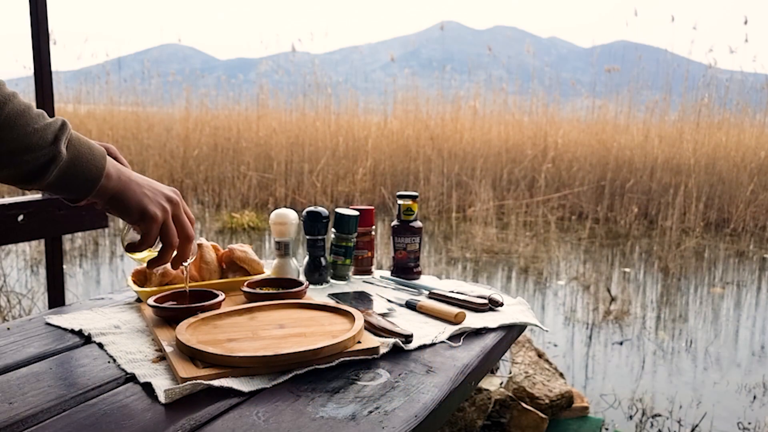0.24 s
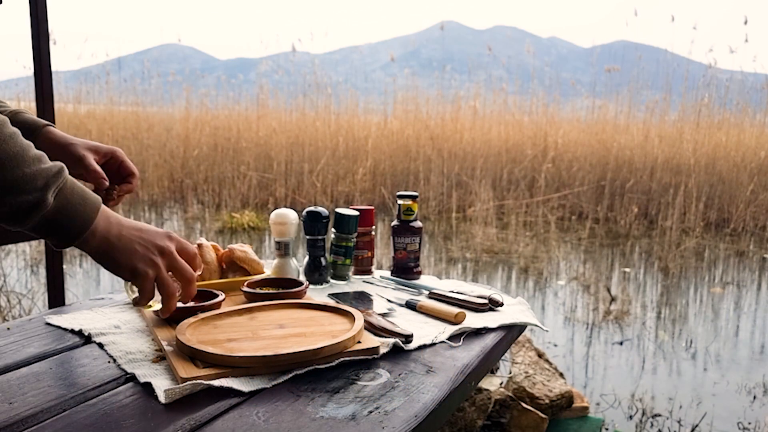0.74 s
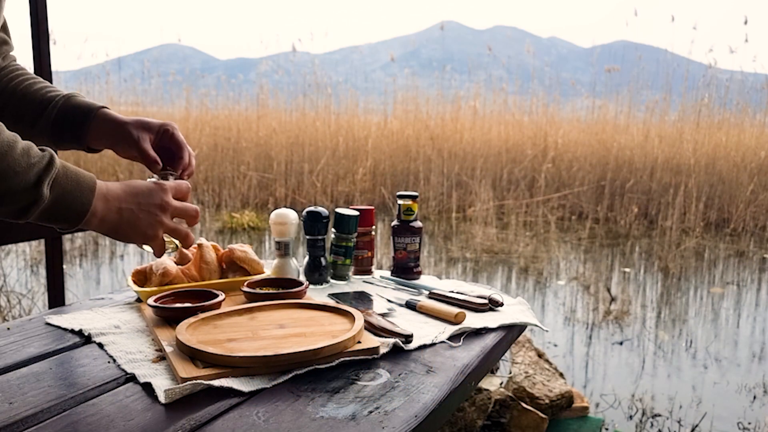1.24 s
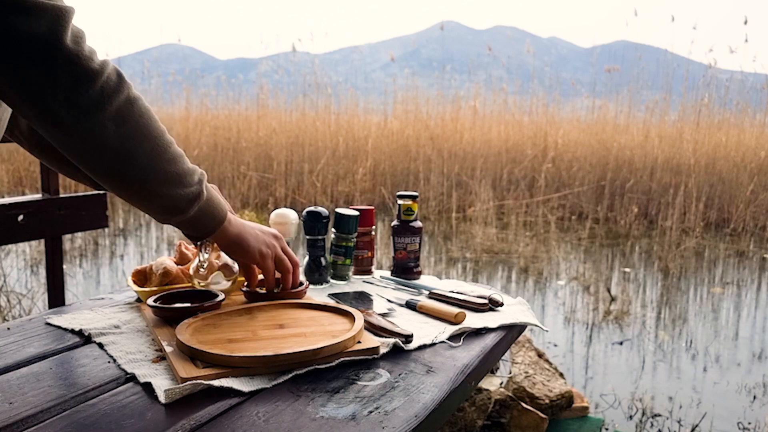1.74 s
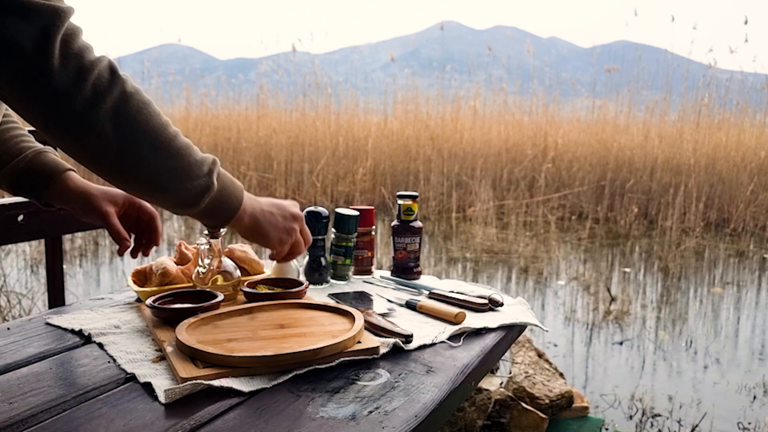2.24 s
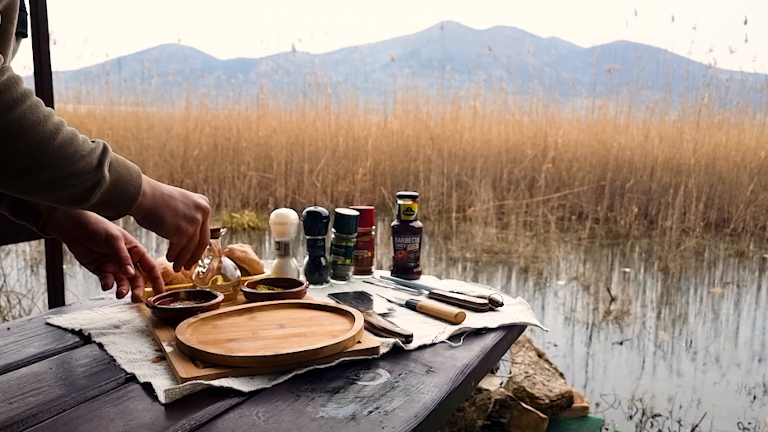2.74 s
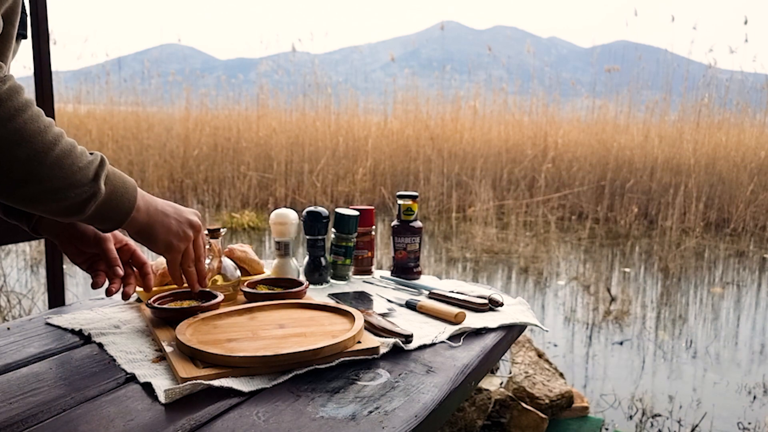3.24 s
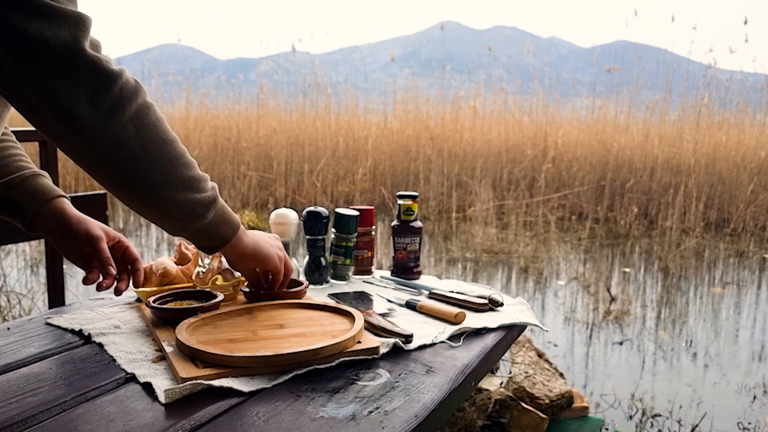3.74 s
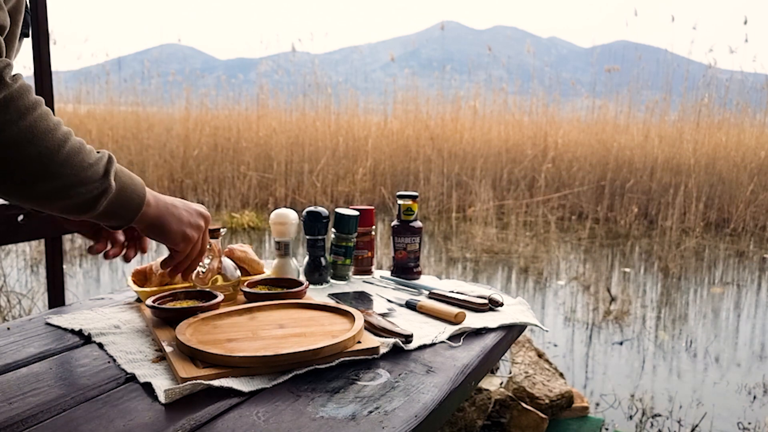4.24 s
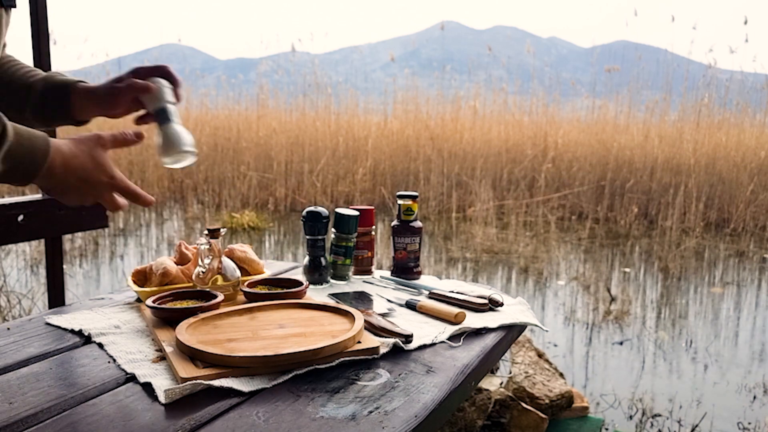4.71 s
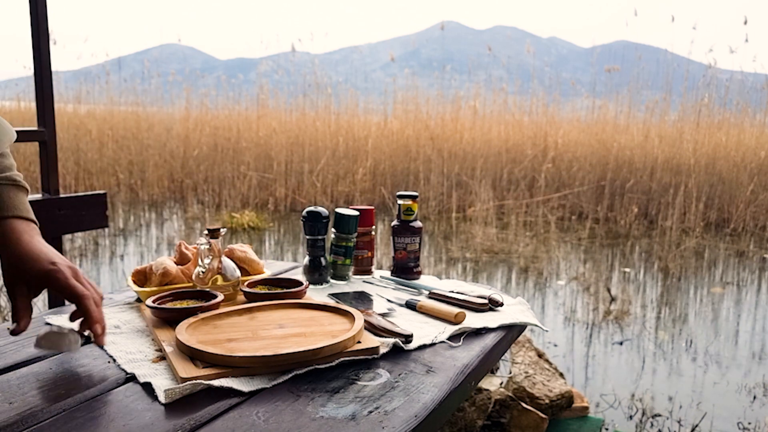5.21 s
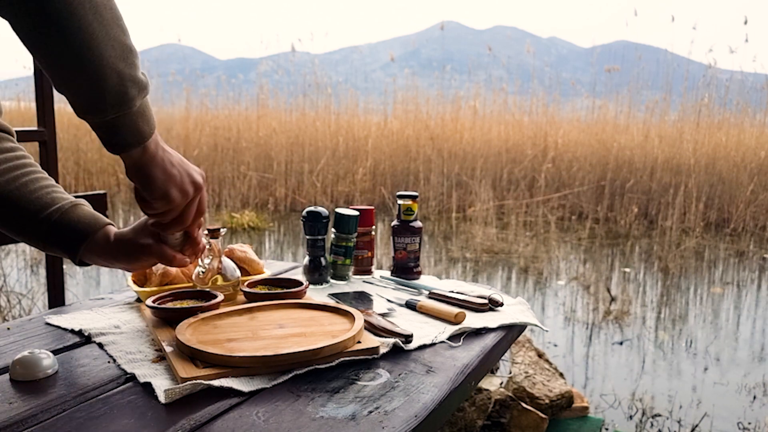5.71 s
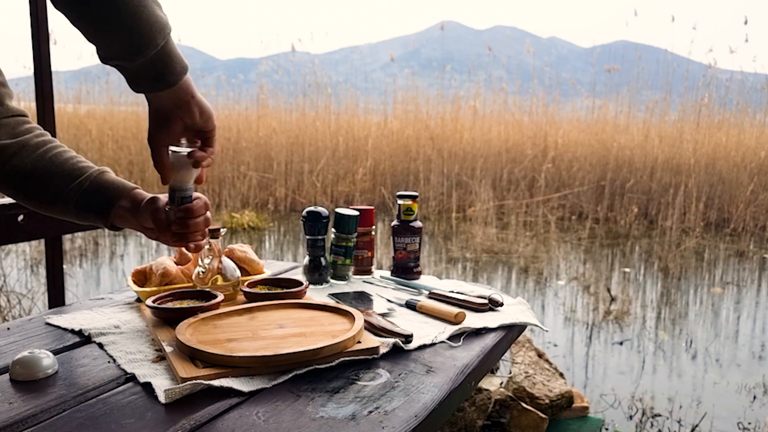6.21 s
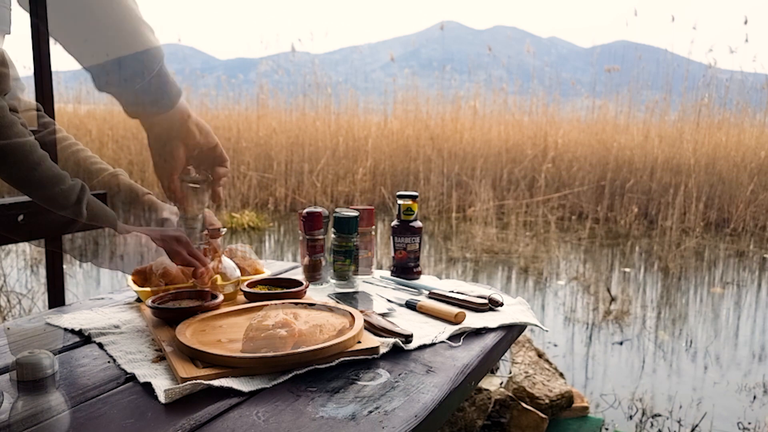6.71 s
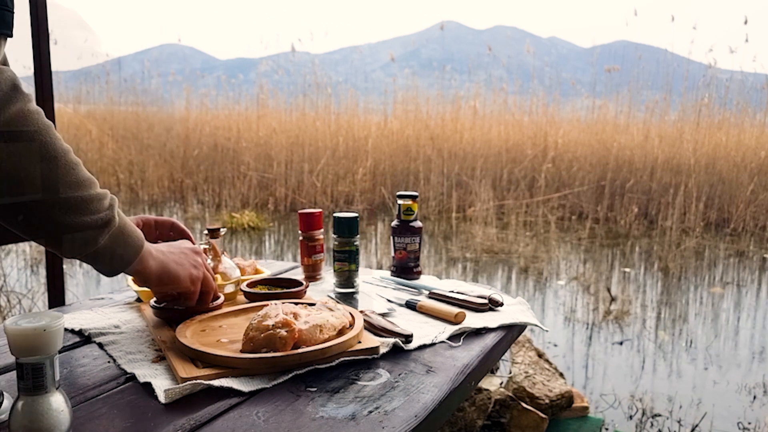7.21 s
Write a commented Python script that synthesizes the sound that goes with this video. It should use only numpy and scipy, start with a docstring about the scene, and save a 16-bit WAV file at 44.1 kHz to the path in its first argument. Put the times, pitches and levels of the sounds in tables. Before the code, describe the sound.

A quiet lakeside, heard in close stereo with the hands to the left. Low wind rumble, soft reed hiss, faint crackle and scattered water plips continue throughout; two brief gusts brush the microphones in the first 0.3 seconds. Thin ticks of fingers on jars and food come sparsely, with very faint bird-like whistles. At 1.8 a glass bottle clinks brightly on a clay bowl, chattering quickly over dull plank thuds until 1.95. At 4.6 salt slides with a short swish as the mill is lifted. At 5.0 its plastic cap clicks loose, then at 5.26 lands with a loud double crack and rattles to rest by 5.45. Dry, crisp salt crunches follow in short twists at 5.55, 5.75, 5.85, 6.15 and 6.6. From 6.7 the wind and lapping water grow fuller, with more ticks and a clearer plip near 7.4.

```python
"""Reeds hiss, water plips and a light wind rumbles by a lake while hands season food on a wooden table:
a glass bottle clinks on a bowl, a salt mill is lifted, its plastic cap pops off and bounces, the mill crunches.
Wind and water are shaped noise, glass, clay and planks damped modes, small contacts noise bursts in resonances,
salt random cracks. Two spaced microphones to the right of the hands give the left-right delay."""
import sys
import numpy as np
from scipy import signal
from scipy.fft import rfft, irfft, next_fast_len
from scipy.io import wavfile
from scipy.ndimage import uniform_filter1d, map_coordinates

SR = 44100
rng = np.random.default_rng(int(sys.argv[2]) if len(sys.argv) > 2 else 0)


def store_wav(level_fs):
    """Save 16-bit WAV to argv[1]."""
    pcm = np.round(np.clip(np.atleast_2d(level_fs), -1, 1) * 32767)
    wavfile.write(sys.argv[1], SR, pcm.T.astype(np.int16))


N = 328986


def amp(db):
    """dB to gain."""
    return 10 ** (np.asarray(db) / 20)


def unit(x):
    """Scaled to rms 1."""
    return x / np.sqrt(np.mean(x ** 2) + 1e-20)


def along(points, hz):
    """(Hz, value) points interpolated on a log frequency axis."""
    f, v = np.transpose(points)
    return np.interp(np.log(hz + 1), np.log(f + 1), v)


def shaped(spectrum):
    """Gain as a function of frequency, from (Hz, dB) points."""
    return lambda hz: amp(along(spectrum, hz))


def wobble(rate_hz):
    """A smooth random curve, rate_hz knots a second."""
    knots = rng.standard_normal(int(N * rate_hz / SR) + 4)
    return map_coordinates(knots, [np.arange(N) * rate_hz / SR])


def filtered(x, response):
    """x times a complex response of frequency."""
    m = next_fast_len(N + SR // 2)
    return irfft(rfft(x, m) * response(np.fft.rfftfreq(m, 1 / SR)), m)[..., :N]


def coloured(x, spectrum):
    """x through a spectrum, rms 1."""
    return unit(filtered(x, shaped(spectrum)))


def rush(spectrum, patchy_db):
    """Stereo noise of rms 1 with time-frequency patches of random gain; the sides differ more in the treble."""
    # left-right likeness: (frequency [Hz], correlation [0-1])
    likeness = [(25, .4), (60, .85), (300, .65), (700, .6), (1400, .35), (5000, .25), (7500, .05)]
    z = signal.stft(rng.standard_normal((2, N + 512)), nperseg=512)[2]
    field = rng.standard_normal(z.shape[1:])
    field = uniform_filter1d(field, size=6, axis=0)
    field = uniform_filter1d(field, size=8, axis=1)
    pair = signal.istft(z * amp(patchy_db * unit(field)), nperseg=512)[1][:, :N]

    def mid_side_gains(hz):
        turn = np.arccos(np.clip(along(likeness, hz), -1, 1)) / 2
        return shaped(spectrum)(hz) * [np.cos(turn), np.sin(turn)]

    mid, side = filtered(pair, mid_side_gains)
    return unit(np.array([mid + side, mid - side]))


def grit(rate_hz, spread_db):
    """Random single-sample cracks, a few much larger than the rest."""
    hits = rng.random(N) < rate_hz / SR
    sizes = np.minimum(rng.exponential(size=N), np.e)
    return hits * rng.choice([-1, 1], N) * amp(spread_db * sizes)


def ring(modes, rise_s, spread_db=2):
    """One blow: damped modes of jittered level, neighbours opposite in sign so close pairs swell; peak 1."""
    t = np.arange(SR // 5) / SR
    tone = np.zeros(len(t))
    for k, (hz, db, t60) in enumerate(modes):
        decay = amp(db + spread_db * rng.normal() - 60 * t / t60)
        tone += (-1) ** k * decay * np.sin(2 * np.pi * hz * t)
    x = tone * (1 - np.exp(-t / rise_s)) ** 2
    return x / np.abs(x).max()


def rattle(t60_s, response, blow=1.77):
    """A sharp blow and dying noise behind it, through a response of frequency; peak 1."""
    t = np.arange(4096) / SR
    x = amp(-60 * t / t60_s) * rng.standard_normal(len(t))
    x[0] = blow
    x = np.roll(x, 64)  # about 1.5 ms of lead-in
    x = irfft(rfft(x) * response(np.fft.rfftfreq(len(t), 1 / SR)))[:3500]
    return x / np.abs(x).max()


def resonance(f, modes, pitch_hz):
    """Causal sum of resonances given as (multiple of the pitch, relative width, dB)."""
    total = 0
    for k, (multiple, width, db) in enumerate(modes):
        centre = multiple * pitch_hz
        damping = 1j * f * width * centre
        total = total + (-1) ** k * amp(db) * damping / (centre ** 2 - f * f + damping)
    return total


def stroke(s, length_s, rise_s, fall_s):
    """Gain that swells up to time s, holds for length_s, then dies 60 dB in fall_s."""
    t = np.arange(N) / SR - s
    return np.clip(1 + t / rise_s, 0, 1) ** 2 * amp(-60 * np.clip(t - length_s, 0, 1) / fall_s)


def add(track, s, x):
    """Mixes a sound into a track at time s."""
    part = track[..., round(s * SR):][..., :x.shape[-1]]
    part += x[..., :part.shape[-1]]


def left_leads(pair, lead_samples):
    """The left microphone hears the source lead_samples before the right."""
    sides = np.array([[1], [-1]])  # each side shifted by half the lead
    return filtered(pair, lambda hz: np.exp(1j * np.pi * hz * lead_samples / SR * sides))


def placed(x, lead_samples, wet_db):
    """Source to the left; each side adds its own scattered answer, decaying noise."""
    # table, posts and roof: (frequency [Hz], decay t60 [s])
    shelter = [(300, 0.057), (2000, 0.088), (6000, 0.063), (14000, 0.055)]
    hz, t, z = signal.stft(rng.standard_normal((2, SR // 5)), SR, nperseg=128)
    decay = amp(-60 * t / along(shelter, hz)[:, None])
    tail = signal.istft(z * decay, SR, nperseg=128)[1]
    tail = tail / np.linalg.norm(tail[0])
    wet = signal.fftconvolve(np.pad(x, (8, 0))[None], tail, axes=1)[:, :N]
    return left_leads(x + amp(wet_db) * wet, lead_samples)


def air():
    """Wind rumble, lake murmur and reed hiss, noises drifting on their own; faint crackle rides on them."""
    # spectra: (frequency [Hz], relative level [dB per Hz])
    rumble_spectrum = [(12, -20), (20, 1.5), (48, -7.5), (97, -2), (166, 0.5), (216, -7), (271, -23),
                       (300, -29.5), (390, -46.5), (660, -120)]
    murmur_spectrum = [(150, -38.5), (250, -14), (710, -14), (802, -12.5), (1280, -14), (3340, -13.5),
                       (4820, -7.5), (6700, -23), (14400, -29), (16000, -39)]
    # reed hiss before and after the wind freshens: (frequency [Hz], relative level [dB per Hz])
    calm_reeds = [(3000, -41.5), (3900, -8.5), (4600, 5), (5200, 6), (6000, -18), (7500, -31.5)]
    fresh_reeds = [(3000, -30), (4400, -9), (5200, -1.5), (6100, -1.5), (7200, -12), (11000, -26)]
    # water stirred by the fresher wind: (frequency [Hz], relative level [dB per Hz])
    lapping = [(150, -13), (220, -4.5), (450, -0.5), (700, -13.5), (1500, -11), (3000, -27)]
    # the wind freshens: (start [s], end [s])
    freshen_s = (6.7, 6.8)
    crackle_spectrum = [(2000, -17.5), (6000, -6), (12000, -21.5), (16000, -18.5)]  # (Hz, dB)

    fresh = np.interp(np.arange(N) / SR, freshen_s, (0, 1))
    rumble_db = -77 + 6 * fresh + 1.23 * wobble(2.44) + 0.68 * wobble(5.7)
    murmur_db = -70 + 5 * fresh + 1.5 * wobble(6)
    reed_db = -69 + 5 * fresh + 0.54 * wobble(37)
    turn = fresh * np.pi / 2  # equal-power crossfade
    reeds = np.cos(turn) * rush(calm_reeds, patchy_db=1.6)
    reeds += np.sin(turn) * rush(fresh_reeds, patchy_db=1.6)
    out = amp(rumble_db) * rush(rumble_spectrum, patchy_db=2.0)
    out += amp(murmur_db) * rush(murmur_spectrum, patchy_db=2.84)
    out += amp(-68) * np.sin(turn) * rush(lapping, patchy_db=5.0)
    out += amp(reed_db) * reeds
    crackle = coloured(grit(33, spread_db=8.5), crackle_spectrum)
    return left_leads(out, 6.4) + amp(-86.0) * placed(crackle, lead_samples=7.7, wet_db=2.0)


def gusts():
    """Gusts brush the microphones: swells of low rumble and broad rustle noise."""
    # gusts: (time [s], length [s], fall t60 [s], rumble [dB], rustle [dB])
    gust_rows = [(0, .1, 0.047, -59, -57), (0.223, 0.02, 0.065, -59, -59.5),
                 (0.26, 0.022, .5, -58.5, -72.5)]
    # gust rumble and windscreen rustle: (frequency [Hz], relative level [dB per Hz])
    low_spectrum = [(30, -10), (90, 0), (170, -6), (300, -20), (600, -50)]
    rustle_spectrum = [(120, -36), (200, -5), (635, -3), (821, -10.5), (1840, -3), (7410, -18.5),
                       (9930, -35), (16000, -15)]
    low = rush(low_spectrum, patchy_db=1)
    rustle = rush(rustle_spectrum, patchy_db=4.5)
    out = np.zeros((2, N))
    for s, length, fall, low_db, rustle_db in gust_rows:
        swell = stroke(s, length, rise_s=0.013, fall_s=fall)
        out += swell * (amp(low_db) * low + amp(rustle_db) * rustle)
    return out


def small_contacts(rows, rise_s, t60_s, body, lead_samples, wet_db):
    """Rattles that swell briefly in a small resonant body tuned to the pitch of each."""
    out = np.zeros(N)
    for s, db, pitch_hz in rows:
        x = rattle(t60_s, lambda f: resonance(f, body, pitch_hz))
        x = x * (1 - np.exp(-np.arange(len(x)) / SR / rise_s)) ** 2
        add(out, max(s - .0015, 0), amp(db) * x / np.abs(x).max())
    return placed(out, lead_samples, wet_db)


def plips():
    """Short water plips as damped resonances, with fainter ones at random."""
    # plips: (time [s], level [dB], pitch [Hz])
    plip_rows = [(0.209, -46.5, 1850), (0.572, -55, 1580), (1.268, -52.5, 2030), (1.324, -56, 1940),
                 (2.065, -56, 780), (2.315, -50.5, 2210), (2.768, -57.5, 2030), (3.658, -53, 1970),
                 (3.739, -52, 1550), (3.848, -56.5, 790), (4.143, -56.5, 2150), (4.198, -51, 1970),
                 (4.543, -50.5, 1820), (5.047, -50.5, 1836), (6.274, -64, 900), (5.226, -55, 1980),
                 (5.478, -50, 2030), (6.276, -51.5, 1750), (6.432, -54.5, 2100), (6.832, -47.5, 1220),
                 (6.954, -50, 2500), (7.375, -38.5, 1657), (7.376, -51, 860)]
    body = [(1, 0.092, 4.5), (1.5, 0.12, -6.5), (2.4, 0.53, -18.5)]  # (multiple of pitch, relative width, dB)
    far = [(s * N / SR, -65 + 8 * u, 1500 * 3 ** v) for s, u, v in rng.random((46, 3))]
    return small_contacts([*plip_rows, *far], 0.0027, 0.017, body, lead_samples=6.06, wet_db=2.0)


def ticks():
    """Thin ticks of fingers on jars and food, narrow resonances, with fainter ones at random."""
    # ticks: (time [s], level [dB], pitch [Hz])
    tick_rows = [(0.2718, -46, 5640), (0.4467, -58, 5330), (0.495, -50.5, 12700), (0.5901, -47, 6800),
                 (0.7063, -46, 6000), (0.8107, -44, 13900), (0.9095, -44.5, 11600), (.4, -51.5, 4470),
                 (.85, -53, 5000), (.937, -50, 3390), (1.2236, -50, 14600), (1.262, -51, 4750),
                 (1.358, -49, 5200), (1.51, -44, 5670), (1.5507, -40, 5870), (1.7008, -42, 14300),
                 (2.2747, -49.5, 10200), (2.354, -49, 11600), (2.4733, -52, 12200), (3.1318, -41.5, 14200),
                 (3.235, -45, 8770), (3.5126, -52.5, 5800), (3.5917, -48, 7530), (3.7245, -45, 7750),
                 (3.7538, -41, 6220), (3.756, -47, 11600), (3.95, -57.5, 5450), (4.32, -55, 5530),
                 (4.443, -54.5, 4600), (4.143, -49, 5140), (4.198, -56, 6060), (4.35, -43, 5820),
                 (4.808, -42, 14800), (4.795, -53, 3770), (4.841, -50, 8550), (6.25, -54.5, 7260),
                 (6.725, -54, 9050), (5.5094, -50.5, 8330), (6.776, -39, 14000), (2.13, -47, 4370),
                 (2.535, -53, 5670), (2.62, -56.5, 5980), (6.859, -43, 6020), (7.21, -45, 5840),
                 (6.913, -51.5, 6330), (6.9878, -41.5, 5250), (7.3547, -42, 7400)]
    body = [(.5, 1, -15.5), (1, 0.043, 9.5), (1.25, 0.66, -23)]  # (multiple of pitch, relative width, dB)
    faint = [(s * N / SR, -62 + 7 * u, 5300 * 2.47 ** v) for s, u, v in rng.random((11, 3))]
    return small_contacts([*tick_rows, *faint], 0.00073, 0.019, body, lead_samples=8.15, wet_db=-4)


def chirps():
    """Faint, slightly rough whistles, perhaps far birds, that swell, sag in pitch and fade."""
    # chirps: (time [s], length [s], level [dB], pitch [Hz])
    chirp_rows = [(1.404, 0.028, -61.5, 2115), (1.94, 0.028, -63.5, 2100), (2.324, 0.027, -57, 1846),
                  (2.325, 0.027, -59, 3930), (2.634, 0.017, -55, 3605), (2.81, 0.027, -64.5, 2094),
                  (2.988, .025, -61.5, 2090), (3.324, .03, -63, 1907), (3.5, 0.036, -62, 2055),
                  (3.682, 0.027, -63, 830), (4.85, 0.031, -61, 2090)]
    sag = 0.06  # share of the pitch lost over a chirp
    out = np.zeros(N)
    for s, length, db, pitch_hz in chirp_rows:
        u = np.linspace(0, 1, round(length * SR))
        phase = 2 * np.pi * np.cumsum(pitch_hz * (1 + sag * (.5 - u))) / SR
        add(out, s, amp(db) * np.sin(np.pi * u) * np.sin(phase))
    return placed(out * amp(2.5 * wobble(150)), lead_samples=6.4, wet_db=-6.5)


def planks():
    """Dull pushes ring the modes of the planks; each contact tilts the drive of the higher modes."""
    # pushes: (time [s], level [dB], rise [s], loss [dB per octave])
    thuds = [(1.791, -39.5, 0.068, 4), (1.832, -35, 0.0067, -9.5), (1.937, -41.5, 0.00048, 1.5),
             (1.946, -39, 0.004, 1), (4.819, -42.5, 0.032, 30), (7.379, -51.5, 0.0039, -3.5)]
    # plank modes: (frequency [Hz], level [dB], t60 [s])
    plank_modes = [(150.3, 1.5, 0.067), (289.6, -3.5, 0.06), (377, -7, 0.063), (556, -0.5, 0.029),
                   (680, -12.5, 0.043), (760, -11.5, 0.051)]
    lowest_hz = plank_modes[0][0]
    out = np.zeros(N)
    for s, db, rise, loss_db in thuds:
        tilted = [(hz, level - loss_db * np.log2(hz / lowest_hz), t60) for hz, level, t60 in plank_modes]
        add(out, s, amp(db) * ring(tilted, rise))
    return np.array([out * amp(-1.3), out * amp(1.0)])


def bottle():
    """The bottle chatters on the bowl: modes of glass and clay ring, and the bowl clatters on the board."""
    # touches: (time [s], glass ring [dB], clay ring [dB], clatter [dB])
    clinks = [(1.7915, -17, -42, -18), (1.8096, -27, -44, -25), (1.819, -42, -46, -32),
              (1.826, -50, -50, -38), (1.833, -50, -30, -26), (1.836, -50, -33, -26),
              (1.845, -60, -30, -38), (1.855, -60, -36, -45), (1.875, -65, -50, -42),
              (1.893, -70, -44, -60)]
    # modes of the glass and of the bowl: (frequency [Hz], level [dB], t60 [s])
    glass_modes = [(3860, 0, .1), (3962, -2.5, .1), (9470, -16, .09), (9590, -21, .07), (7526, -26, .03),
                   (11970, -23, .04)]
    bowl_modes = [(754, -11, 0.05), (1118, 2, .055), (1520, 2, 0.01), (2162, 5, 0.015), (2682, 5, 0.013),
                  (3560, -13, .03), (4596, -6, 0.037)]
    # loose clay on wood: (frequency [Hz], relative level [dB])
    clatter_spectrum = [(200, -20), (500, -3), (1500, 0), (3000, -3), (6000, -10), (9000, -26),
                        (16000, -50)]
    rings, clatter = np.zeros(N), np.zeros(N)
    for s, glass_db, clay_db, clatter_db in clinks:
        glass = amp(glass_db) * ring(glass_modes, rise_s=.001, spread_db=.5)
        clay = amp(clay_db) * ring(bowl_modes, rise_s=.0004)
        add(rings, s, glass + clay)
        add(clatter, s - .0015, amp(clatter_db) * rattle(0.014, shaped(clatter_spectrum), blow=4.45))
    return placed(clatter, lead_samples=3.2, wet_db=-5) + placed(rings, lead_samples=3.2, wet_db=-12)


def mill():
    """Salt slides, then crystals crack between the burrs: dense grit under single snaps, in two bands."""
    # slides in the lifted mill: (time [s], length [s], level [dB])
    slides = [(4.596, 0.0059, -27.5), (4.606, 0.024, -49), (4.626, .002, -40)]
    # sliding salt: (frequency [Hz], relative level [dB per Hz])
    salt_spectrum = [(530, -46.5), (900, -43.5), (1990, -29.5), (2600, -13.5), (3470, -27.5), (4310, -4),
                     (7680, -9.5), (8450, -8), (9650, -19.5), (14200, -16.5), (16000, -29)]
    # pushes of the hand: (time [s], length [s], bright band [dB], dark band [dB])
    twists = [(5.555, 0.0063, -40, -56), (5.568, 0.049, -40.5, -51.5), (5.623, 0.025, -44.5, -72),
              (5.73, 0.035, -46.5, -59), (5.846, 0.045, -43, -53.5), (6.121, 0.072, -46, -56),
              (6.139, 0.0094, -41, -60.5), (6.608, 0.0034, -41.5, -54), (6.62, 0.1, -54.5, -65),
              (6.652, 0.026, -44.5, -54.5), (6.687, 0.0055, -54, -49.5)]
    # largest crystals breaking: (time [s], bright band drive [dB], dark band drive [dB])
    snap_rows = [(5.5547, -30, -36), (5.5574, -26, -47), (5.5755, -19, -23), (5.594, -24, -32),
                 (5.608, -24, -36), (5.6222, -27, -31), (5.6462, -30, -47), (5.7486, -25, -36),
                 (5.752, -20, -46), (5.7595, -20, -34), (5.8618, -26, -41), (5.8659, -20.5, -27.5),
                 (5.879, -17, -34), (5.892, -15, -33), (5.8972, -24, -33), (6.1245, -21.5, -29),
                 (6.15, -23, -27), (6.1819, -22.5, -36.5), (6.1869, -33, -28), (6.1967, -24.5, -20),
                 (6.6069, -24.5, -26), (6.63, -25.5, -32), (6.642, -27, -47), (6.6694, -26, -36),
                 (6.689, -22, -36), (6.695, -25, -18.5)]
    # bright and dark band of the mill: (frequency [Hz], relative level [dB per Hz])
    bright_band = [(2650, -31), (4500, -12), (5840, -7), (6770, 3.5), (12200, 3), (14100, 2), (15200, 3.5),
                   (16200, -15), (16500, -44)]
    dark_band = [(760, -44), (1300, -33), (1820, -15.5), (2250, -0.5), (2560, 0.5), (5150, -6), (6000, -14),
                 (7800, -34), (13200, -120)]

    sliding = sum(amp(db) * stroke(s, length, rise_s=0.0035, fall_s=0.025) for s, length, db in slides)
    out = sliding * coloured(grit(4300, spread_db=5.2), salt_spectrum)
    crunch = grit(1300, spread_db=4.5) * amp(3 * wobble(200) + 2.5 * wobble(60))
    bright, dark = coloured(crunch, bright_band), coloured(crunch, dark_band)
    for s, length, bright_db, dark_db in twists:
        push = stroke(s, length, rise_s=0.0089, fall_s=0.035)
        out += push * (amp(bright_db) * bright + amp(dark_db) * dark)
    snaps, t = np.zeros((2, N)), np.arange(300) / SR
    for s, bright_db, dark_db in snap_rows:
        burst = amp(-60 * t / 0.0021) * rng.choice([-1, 1], len(t))
        add(snaps, s - .0003, amp([[bright_db], [dark_db]]) * burst)
    out += filtered(snaps, lambda hz: amp([along(bright_band, hz), along(dark_band, hz)])).sum(axis=0)
    return placed(out, lead_samples=3.22, wet_db=-4.5)


def cap():
    """The cap is pried off, drops and rocks to rest: rattles in its hollow, rim clicks, knocks on the board."""
    # contacts: (time [s], level [dB], hollow pitch [Hz], rattle t60 [s], rim click relative to rattle [dB])
    cap_hits = [(5.001, -41.5, 4440, 0.033, 2), (5.006, -36, 3340, 0.024, 11), (5.2582, -11, 3800, .003, 2),
                (5.2634, -5.5, 3870, .004, 1), (5.2672, -22, 4270, 0.057, 1), (5.284, -28, 3580, 0.024, 8),
                (5.312, -31.5, 2990, 0.03, -3), (5.317, -23.5, 3040, 0.02, 1.5),
                (5.3563, -24, 2650, 0.011, 2.5), (5.385, -35.5, 2660, 0.018, 3),
                (5.407, -36, 2500, 0.018, 3.5), (5.424, -37, 2150, 0.007, 15)]
    # resonances of the hollow: (multiple of the pitch, relative width, level [dB])
    hollow = [(0.301, 0.21, -15), (0.549, 0.35, -5), (1, 0.14, 12), (1.2, 0.058, -16), (1.65, .1, -6.5),
              (2.4, 0.65, -17)]
    # rim click: (frequency [Hz], relative level [dB])
    rim_spectrum = [(400, -27.5), (1500, -4), (5000, 0), (9000, -4.5), (16000, -22)]
    # heavier contacts sound the board: (time [s], level [dB])
    knocks = [(5.0, -50), (5.004, -36), (5.2578, -48), (5.2635, -46), (5.285, -47)]
    # modes of the board under the cap: (frequency [Hz], level [dB], t60 [s])
    board_modes = [(445, -2, 0.024), (690, -7.5, 0.0069), (362.5, -20, 0.053)]
    out = np.zeros(N)
    for s, db, pitch_hz, t60, click_db in cap_hits:
        voiced = rattle(t60, lambda f: resonance(f, hollow, pitch_hz))
        click = rattle(0.17 * t60, shaped(rim_spectrum), blow=2.0)
        add(out, s - .0015, amp(db) * (voiced + amp(click_db) * click))
    for s, db in knocks:
        add(out, s, amp(db) * ring(board_modes, rise_s=0.00057))
    return placed(out, lead_samples=5.63, wet_db=-2)


def scene():
    """All sources summed."""
    return air() + gusts() + plips() + ticks() + chirps() + planks() + bottle() + mill() + cap()


def record(dry):
    """Low-pass: the treble fades out to nothing at top_hz."""
    top_hz, fade_hz = 16500, 800
    return filtered(dry, lambda hz: np.clip((top_hz - hz) / fade_hz, 0, 1) ** 2)


dry = scene()
out = record(dry)
store_wav(out)
```